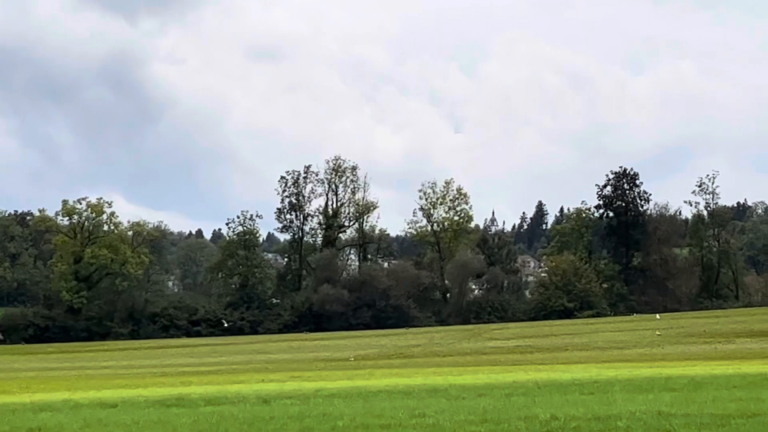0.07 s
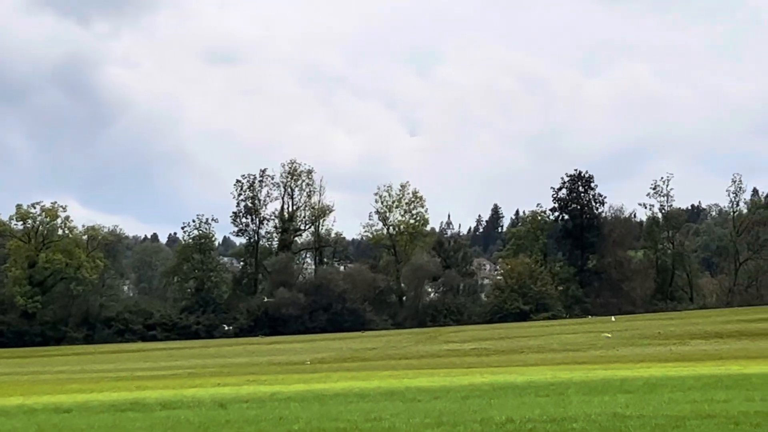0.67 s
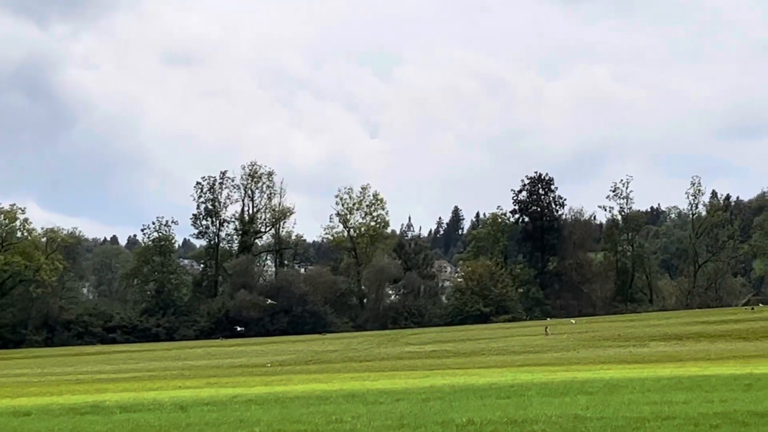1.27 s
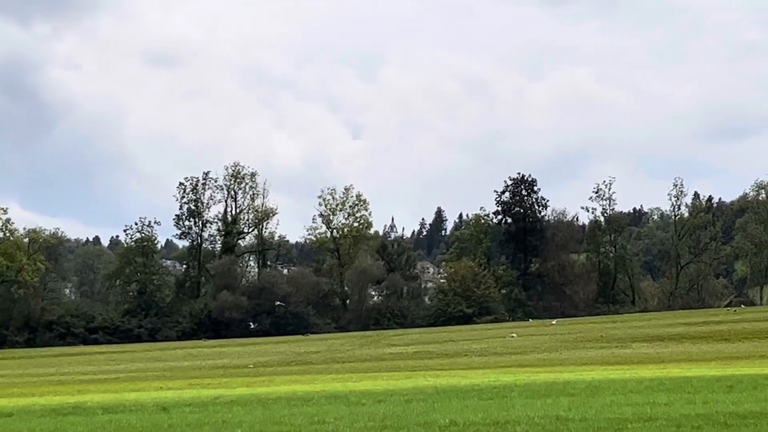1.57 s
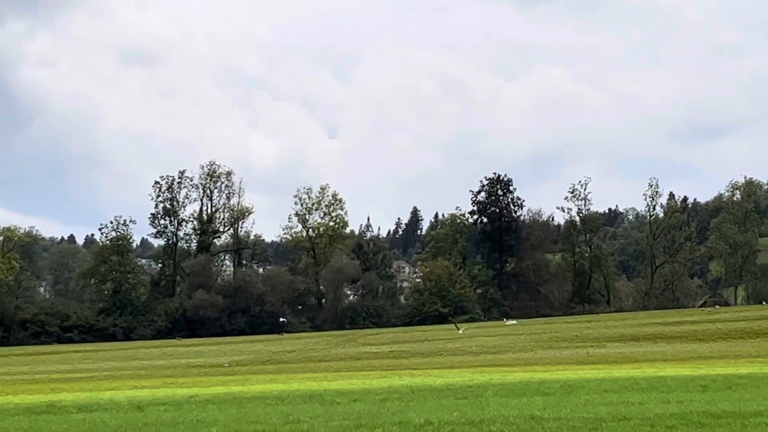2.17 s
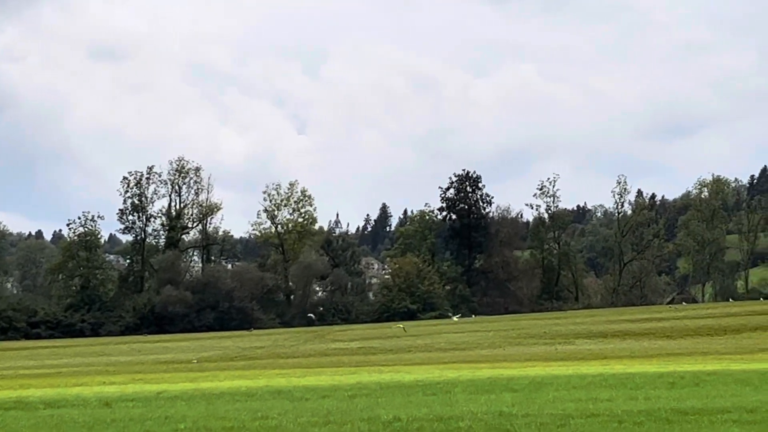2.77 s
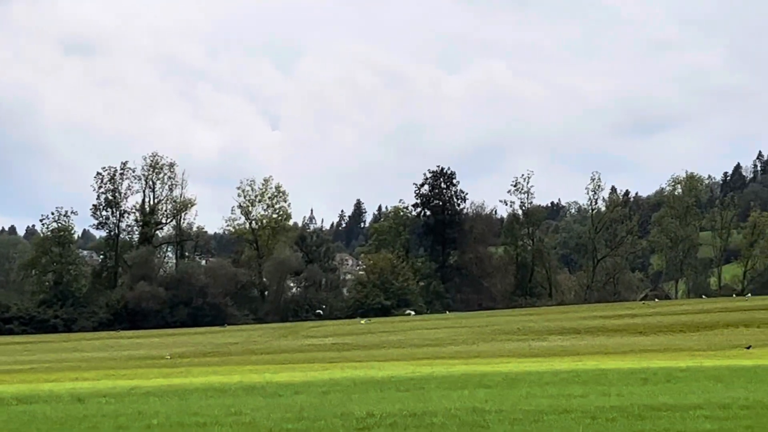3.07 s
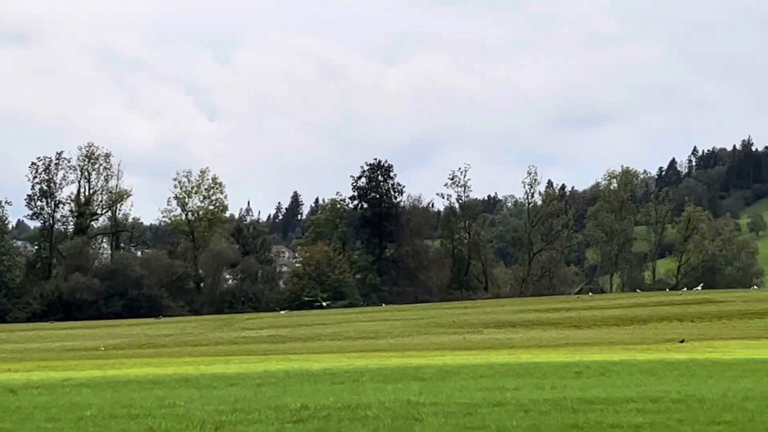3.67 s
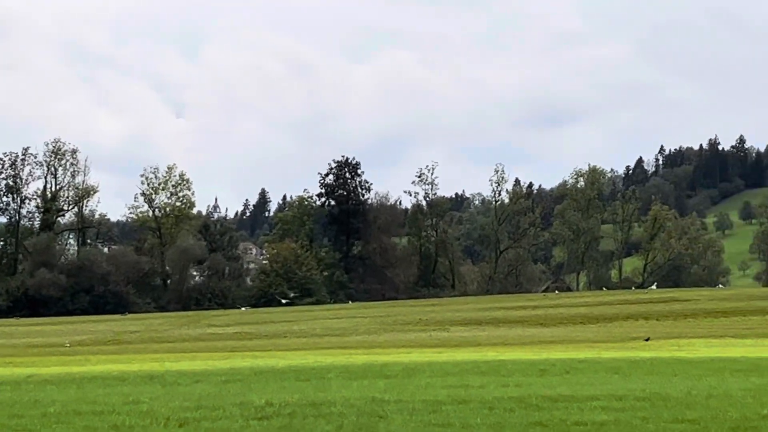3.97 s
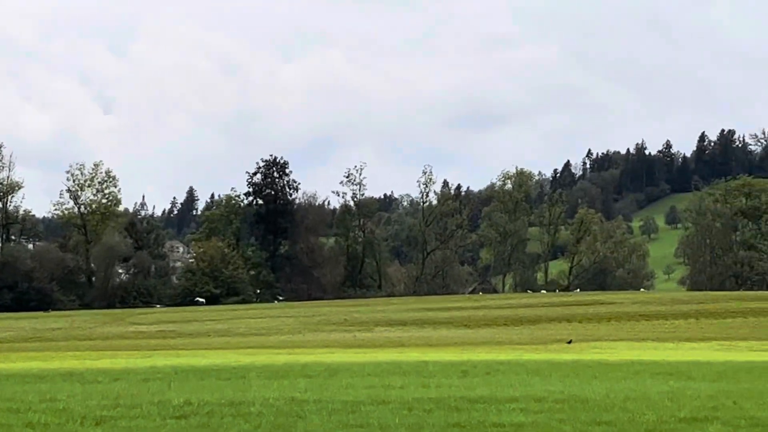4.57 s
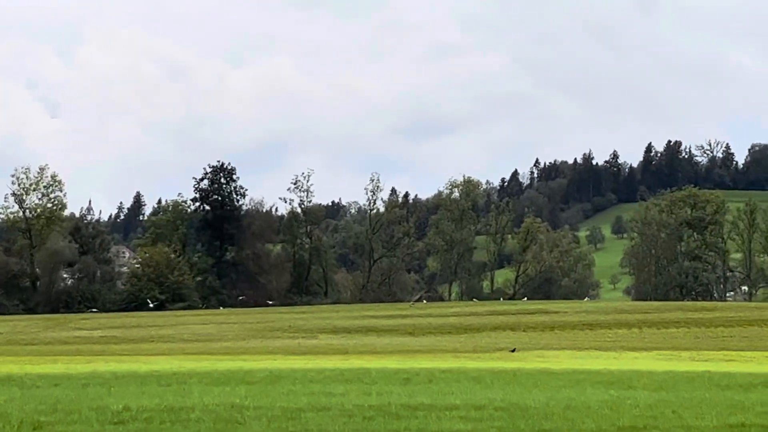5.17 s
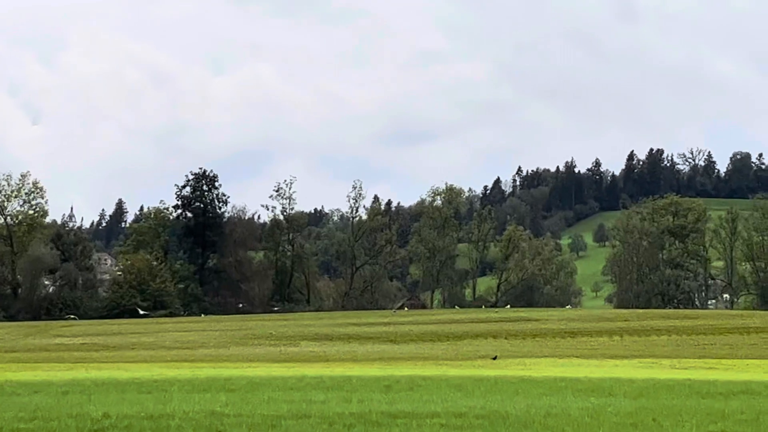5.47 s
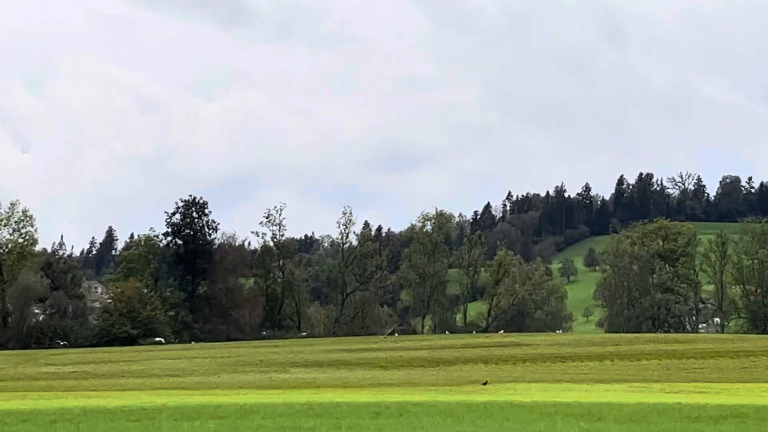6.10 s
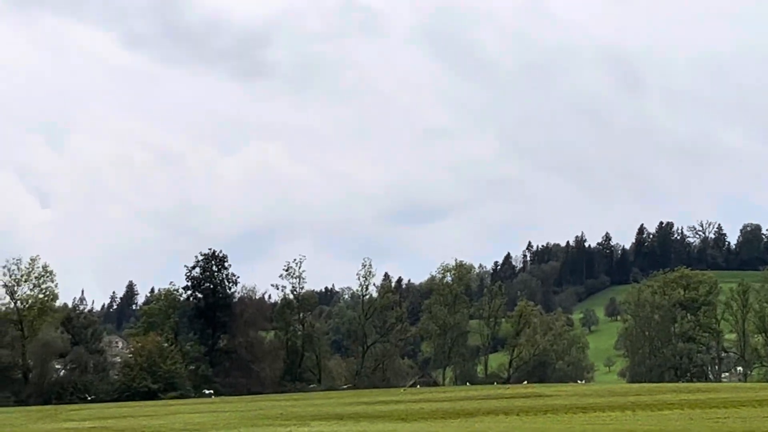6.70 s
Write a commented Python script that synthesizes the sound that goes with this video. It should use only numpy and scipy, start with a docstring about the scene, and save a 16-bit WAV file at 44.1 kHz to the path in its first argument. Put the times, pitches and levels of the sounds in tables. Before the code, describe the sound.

Outdoors by a meadow, a far-off car hums and rumbles along a country road, drawing nearer. A faint knock and a tick come from handling the camera. The engine drone and the rush of tyres swell to a peak as the car goes by close to the microphone, then drop in pitch and start to recede.

```python
"""A car on a country road beside an open field. Far off, only low rumble, engine drone and the band of
tyre tread song carry over the grass; a distant bird calls once and four soft low bumps sound. The
hand-held camera ticks at 4 and 4.9 s. As the car nears, mid-range roar and tyre hiss fill in, the notch
of the ground reflection climbs and an 85 Hz tone swells briefly. The car passes close by at 5.3 s,
engine pitch falling by Doppler shift, and drives on."""
import sys
import numpy as np
from scipy import signal
from scipy.fft import rfft, irfft, next_fast_len
from scipy.io import wavfile
from scipy.ndimage import map_coordinates

SR = 44100
rng = np.random.default_rng(int(sys.argv[2]) if len(sys.argv) > 2 else 0)


def wav_out(sig):
    """Save sig, one row per channel (or a flat mono array), as 16-bit PCM at SR to the path in sys.argv[1]."""
    wavfile.write(sys.argv[1], SR, np.round(np.clip(np.atleast_2d(sig).T, -1, 1) * 32767).astype(np.int16))


N = 306054
FRAME, HOP = 2048, 512
TIME_S = np.arange(N) / SR
BINS_HZ = np.maximum(np.arange(FRAME // 2 + 1) * SR / FRAME, 1)
ABREAST_S, SPEED_M_PER_S, NEAREST_M, SOUND_M_PER_S = 5.29, 19, 11.6, 343

# bird call: centre_s, half_length_s, pitch_hz, glide_hz_per_s, peak_db
BIRD_CALL = (.371, .009, 4780, -19000, -81)
# four soft bumps, then an 85 Hz swell as the car draws level: centre_s, half_length_s, pitch_hz, peak_db
LOW_TONES = [(.38, 0.058, 74.8, -42), (1.478, 0.042, 72, -40.5), (2.727, 0.038, 70, -41),
             (3.313, 0.015, 67.86, -36), (5.12, 0.16, 85, -38.5)]
# camera ticks and case knock: start_s, unfiltered_db, decay_s
CAMERA_TICKS = [(4.002, -62, .008), (4.010, -61, .008), (4.022, -66, .01), (4.918, -49.5, 0.0026)]
CAMERA_KNOCKS = [(4.003, -39, 0.019)]

# reach and directivity: base_db, loss_db_per_doubling, rear_db, beam_deg, beam_width_deg, beam_db
FIRING_CARRY = (-38, 5.5, 1.5, 24, 17, 9.5)
RUMBLE_CARRY = (-58.5, 5.0, -0.2, 38, 18.5, 4.5)
ROAR_CARRY = (-76.5, 4.5, 2.5, 24.5, 44, 14)
TREAD_CARRY = (-69, 5, -2.5, 45, 34.5, 11)
HISS_CARRY = (-83.0, 7.5, 9, -8.5, 54, -6)
# brief swells and dips: centre_s, half_length_s, gain_db
FIRING_SWELLS = [(4.78, .07, 3), (5.25, .08, -1), (5.78, 0.073, 2.5), (6.38, .1, -1), (6.88, .18, 2.5)]
RUMBLE_SWELLS = [(2.55, 0.48, -2), (4.15, .15, 1), (5.05, 0.073, 3.5), (5.95, 0.12, 1.2), (6.7, .25, -2)]
TREAD_SWELLS = [(.08, .15, 1.5), (1.55, 0.063, 1), (2.5, .4, -1.1), (4.1, 0.14, 1), (4.35, 0.058, -0.5),
                (4.56, 0.11, 1.4), (5.72, 0.088, 0.5), (6.4, 0.12, -1.5)]
HISS_SWELLS = [(.92, .08, 3), (1.55, .07, 4.5), (1.85, .08, 3), (2.9, .25, 1.5), (3.95, 0.29, 1.5),
               (5.22, 0.13, 3), (5.564, 0.13, -1.2)]

# drone, the non-integer partial belt-driven: firing_multiple, coming_db, going_db, loss_db_per_doubling
DRONE_PARTIALS = [(2, -53.5, -51, 6), (3, -45.5, -51, 6), (4, -38, -41, 10.5), (4.28, -52, -45.5, 8),
                  (5, -60, -52, 5.5)]
# far whine on engine order 10: time_s, level_db
ENGINE_WHINE = [(0, -88.5), (.35, -72), (.85, -71.5), (1.2, -86), (1.9, -86), (2.15, -76), (2.4, -88),
                (4, -92)]

# rolling noise spectra: freq_hz, gain_db
RUMBLE_COMING = [(20, -24), (30, -9), (45, 5), (70, 7.5), (100, 0), (160, -3), (210, -6), (260, -11),
                 (330, -18.5), (430, -36.5), (800, -68.5)]
RUMBLE_GOING = [(20, -37), (30, -23), (45, -6), (70, 4.5), (100, -2.5), (160, -1.6), (240, -1.5),
                (330, -10), (430, -14.5), (800, -65.5)]
ROAR_SPECTRUM = [(150, -22), (260, -2), (350, -2), (550, 1), (850, -7.5), (1050, -11), (1400, -16),
                 (2500, -29.5), (5000, -80)]
TREAD_COMING = [(400, -30), (650, -7.5), (850, -6.5), (1100, -8), (1450, -4), (1700, 0.5), (1950, 2),
                (2300, -8.5), (2600, -17.5), (3200, -55.5), (5000, -81)]
TREAD_GOING = [(400, -40), (650, -5.5), (850, 2.5), (1100, -1), (1450, 2.5), (1700, 0.5), (1950, -4.5),
               (2300, -22), (2600, -16), (3200, -43), (5000, -80)]
HISS_FAR = [(300, -50), (1200, -23), (2200, 0.5), (3000, 1), (3600, 4), (4050, -1.5), (4550, -11.5),
            (5100, -7), (5700, -4.5), (6600, -9.5), (8000, -17.5), (10000, -21.5), (14000, -34)]
HISS_NEARING = [(300, -51), (1200, -25), (2200, 6.5), (2850, 1.5), (3600, 7.5), (4500, -1.5), (5100, -2),
                (5600, -7.5), (7200, -4), (10000, -9), (11500, -32.5), (14000, -28)]
HISS_CLOSE = [(300, -50), (1200, -22), (2200, 4.5), (3000, 4), (3600, 0.5), (4500, -3.5), (5100, -3.5),
              (6000, -5.5), (7200, -11), (9500, -17), (11500, -20.5), (14000, -26.5)]
# moving peaks of tread song, roar and tyre ring: time_s, centre_hz, gain_db
TREAD_NOTE = [(0, 1860, 1), (4.2, 1920, 1.5), (4.5, 1450, 5.5), (4.95, 1440, 2), (5.2, 1610, 0),
              (5.5, 1860, 4.5), (5.75, 1790, 3.5), (6.05, 1680, 0.1), (6.55, 1520, 3), (6.94, 1550, 1.5)]
ROAR_PEAK = [(3, 650, -1.5), (4.0, 645, 4), (4.5, 695, 1.5), (4.95, 960, -2.5), (5.15, 900, -2),
             (5.33, 670, 1.5), (5.5, 720, 0), (5.75, 1100, 1.5), (6.05, 1010, -2.5), (6.6, 1050, -0.5)]
TYRE_RING = [(0, 910, 1), (4.2, 923, 2.5), (4.9, 890, 2), (5.25, 870, 0.5), (5.48, 870, 5), (5.7, 793, 3),
             (5.95, 830, -3.5), (6.15, 840, -1), (6.4, 860, 3.5), (6.94, 855, 3)]
# hiss bands, most as the wheel sides show: centre_s, half_length_s, centre_hz, width_oct, gain_db
HISS_SWISHES = [(2.55, .55, 4600, .13, -4), (2.75, .45, 5800, .2, 3), (4.5, 0.33, 6600, .25, -3),
                (4.85, 0.18, 2778, 0.37, 5), (5.03, .08, 12100, 0.41, 4.5), (5.8, .06, 11500, .5, 3.2),
                (5.23, 0.11, 5600, .5, 1.5), (5.41, 0.12, 2880, 0.94, 6.5)]

# left-right balance and phase, with a constant phase flip near 1650 Hz:
# freq_hz, left_minus_right_db, left_lead_rad, coherence
STEREO_COMING = [(60, -0.5, -0.53, 1), (130, 0, -0.56, 1), (262, 4.5, -0.56, 0.9), (392, -1.5, -1.1, 0.2),
                 (483, 0.2, -2, 0.35), (630, -3, -3, 0.63), (780, -7.5, -3, 0.68), (1050, -7, -3, 0.6),
                 (1330, -13.5, -2.5, 0.58), (1640, -18, -2, 0.8), (1720, -17, 0.5, 0.94),
                 (1960, -21.5, 0.3, 0.93), (2250, -14, 0.3, 0.7), (2550, -10, -2, 0.9),
                 (2820, -4.5, 0.5, 0.4), (2920, -3, 1, 0.45), (3240, -2, 0.74, 0.9), (3550, -1, 0, 1),
                 (4500, 0, 0, 1)]
STEREO_ABREAST = [(60, 0.5, 0, 0.99), (260, 0.3, 0, 1), (450, -1, 0.5, 0.75), (650, -3, 2.5, 0.72),
                  (935, -1, 2, 0.57), (1160, -4.5, 1.1, 0.6), (1600, -21, -1.5, 0.62), (1670, -10, 3, 0.9),
                  (1850, -15, 0.5, 0.82), (2060, -10, 3, 0.5), (2250, -4, 1, 0.8), (2600, -6, -0.3, 1),
                  (3000, -3, -0.1, 0.95), (3550, 0, 0, 1)]
STEREO_GOING = [(60, 0.2, 0, 1), (130, 0, 0.34, 0.98), (270, 1.5, 0.72, 0.93), (457, 2.5, 1.5, 0.95),
                (724, 5.5, 2, 1), (1030, -0.5, 2.5, 0.92), (1380, -10, 3.5, 0.93), (1650, -8, 3.5, 0.92),
                (1705, -10, 1, 0.79), (1950, -12, 1.5, 0.78), (2140, 6, 1.4, 0.91), (2350, 0, 0, 1),
                (2750, -1, 0.57, 0.96), (3600, -0.5, 0, 1)]
# microphone ports in the treble: freq_hz, left_lead_rad, coherence
PORT_PHASE = [(5030, 0, 1), (5900, -0.3, 0.51), (7160, -1, 0.6), (7630, -2.5, 1), (8940, -3.5, 1),
              (9700, -4.5, 0.8), (10900, -6, .95), (12800, -8, 1), (14100, -8, .7)]


def from_db(db):
    return 10 ** (np.asarray(db) / 20)


def bell(offset, width):
    return np.exp(-(offset / width) ** 2)


def band(centre_hz, width_oct):
    """Bell of height 1 over the bins."""
    return bell(np.log2(BINS_HZ[:, None] / centre_hz), width_oct)


def swells_db(rows, time_s):
    return sum(gain_db * bell(time_s - centre_s, half_s) for centre_s, half_s, gain_db in rows)


def ramp(time_s, at_s, over_s):
    """Smooth step from 0 to 1."""
    return .5 + .5 * np.tanh((time_s - at_s) / over_s)


def mix(first, second, share):
    return (1 - share) * first + share * second


def at_times(rows, time_s):
    """Table columns at the given times."""
    knots_s, *columns = np.transpose(rows)
    return [np.interp(time_s, knots_s, column) for column in columns]


def at_bins(rows):
    """Table columns over the bins, as column vectors."""
    knots_hz, *columns = np.transpose(rows)
    return [np.interp(np.log(BINS_HZ), np.log(knots_hz), column)[:, None] for column in columns]


def spectrum_db(rows):
    return at_bins(rows)[0]


def drift(rate_hz):
    """Smooth random curve, spread about 1."""
    return map_coordinates(rng.standard_normal(1024), [TIME_S * rate_hz], order=3, mode="wrap")


def white_frames():
    """STFT of white noise at 0 dB per Hz."""
    return signal.stft(rng.standard_normal(N) * np.sqrt(SR / 2), nperseg=FRAME, noverlap=FRAME - HOP)[2]


def bird():
    """Far call: one short falling sine."""
    centre_s, half_s, pitch_hz, glide_hz_per_s, peak_db = BIRD_CALL
    since_s = TIME_S - centre_s
    cycles = since_s * (pitch_hz + glide_hz_per_s * since_s / 2)
    return from_db(peak_db) * bell(since_s, half_s) * np.sin(2 * np.pi * cycles)


def low_tones():
    """Brief low sines that swell and fade."""
    out = np.zeros(N)
    for centre_s, half_s, pitch_hz, peak_db in LOW_TONES:
        envelope = from_db(peak_db) * bell(TIME_S - centre_s, half_s)
        out += envelope * np.sin(2 * np.pi * (pitch_hz * TIME_S + rng.random()))
    return out


def camera_clicks(rows, band_hz):
    """Ticks or knocks of the case: fast-decaying bursts of band noise."""
    envelope = np.zeros(N)
    for start_s, level_db, decay_s in rows:
        envelope += from_db(level_db) * (TIME_S >= start_s) * np.exp(-np.abs(TIME_S - start_s) / decay_s)
    bandpass = signal.butter(2, band_hz, "band", fs=SR, output="sos")
    return signal.sosfilt(bandpass, envelope * rng.standard_normal(N) + 1e-18)


def car_position(time_s):
    """Straight road: distance over NEAREST_M, and bearing_deg (-90 coming, 0 abreast, 90 gone)."""
    along = (time_s - ABREAST_S) * SPEED_M_PER_S / NEAREST_M
    return np.hypot(1, along), np.degrees(np.arctan(along))


def carried_db(carry, time_s):
    """Level of one part of the car, by distance and by the side facing the camera."""
    base_db, loss_db_per_doubling, rear_db, beam_deg, width_deg, beam_db = carry
    distance, bearing_deg = car_position(time_s)
    facing_db = rear_db * np.sin(np.radians(bearing_deg))
    facing_db += beam_db * bell(bearing_deg - beam_deg, width_deg)
    return base_db - loss_db_per_doubling * np.log2(distance) + facing_db


def doppler(time_s):
    """Pitch factor: above 1 coming, below 1 going."""
    _, bearing_deg = car_position(time_s)
    return 1 / (1 + SPEED_M_PER_S / SOUND_M_PER_S * np.sin(np.radians(bearing_deg)))


def ground_reflection_db(time_s, far_hz, near_hz, cut_db, lift_db, width_oct):
    """A delayed copy off the grass cancels a band that climbs; a shallow notch follows behind the car."""
    distance, _ = car_position(time_s)
    sink = distance ** -.15
    notch_hz = far_hz * (near_hz / far_hz) ** ramp(time_s, at_s=5.26, over_s=.3) * sink
    strength = distance ** -.55 * (1 - ramp(time_s, at_s=5.35, over_s=.46))
    comb_db = lift_db * band(2 * notch_hz, width_oct) - cut_db * band(notch_hz, width_oct)
    behind_db = -2.5 * ramp(time_s, at_s=5.95, over_s=.15) * band(660 * sink, width_oct=.39)
    return strength * comb_db + behind_db


def stereo_noise(gains, time_s):
    """Noise shaped by STFT gains; left-right balance and phase go from coming through abreast to going."""
    def passing(coming, abreast, going, turn):
        return mix(coming, mix(abreast, going, turn), ramp(time_s, at_s=4.77, over_s=.14))

    stages = [at_bins(rows) for rows in (STEREO_COMING, STEREO_ABREAST, STEREO_GOING)]
    pans_db, leads_rad, coherences = np.swapaxes(stages, 0, 1)
    cross = passing(*(coherences * np.exp(1j * leads_rad)), turn=ramp(time_s, at_s=5.17, over_s=.11))
    left_ratio = from_db(passing(*pans_db, turn=ramp(time_s, at_s=5.7, over_s=.3)))
    _, port_coherence = at_bins(PORT_PHASE)
    coherence = np.clip(np.abs(cross) * port_coherence, 0, 1)
    mid = np.sqrt(1 + coherence) * white_frames()
    side = np.sqrt(1 - coherence) * white_frames()
    left = left_ratio * (mid + side) * np.exp(1j * np.angle(cross))
    frames = np.array([left, mid - side]) * gains / np.sqrt(1 + left_ratio ** 2)
    return signal.istft(frames, nperseg=FRAME, noverlap=FRAME - HOP)[1][:, :N]


def engine(abreast_hz, sag_hz_per_s, waver_db, port_lag_s):
    """Wavering firing tone, exhaust partials and a thin whine; the rate sags as the driver eases off."""
    firing_hz = (abreast_hz - sag_hz_per_s * (TIME_S - ABREAST_S)) * doppler(TIME_S)
    firing_db = carried_db(FIRING_CARRY, TIME_S) + swells_db(FIRING_SWELLS, TIME_S)
    passed = ramp(TIME_S, at_s=4.98, over_s=.68)
    lead_s = port_lag_s * (2 * passed - 1) * np.array([[.5], [-.5]])  # right leads coming, left going
    phase_rad = 2 * np.pi * (np.cumsum(firing_hz) / SR + firing_hz * lead_s)
    tones = from_db(firing_db + waver_db * drift(rate_hz=9)) * np.sin(phase_rad + .27 * drift(rate_hz=8))
    body_shadow = (-10, 32, -6)  # bearing_deg, width_deg, gain_db
    for multiple, coming_db, going_db, loss_db_per_doubling in DRONE_PARTIALS:
        reach_db = carried_db((0, loss_db_per_doubling, 0, *body_shadow), TIME_S)
        gain = from_db(reach_db + mix(coming_db, going_db, passed) + waver_db * drift(rate_hz=7))
        tones += gain * np.sin(multiple * phase_rad + rng.uniform(0, 2 * np.pi) + .23 * drift(rate_hz=6.4))
    whine_db = at_times(ENGINE_WHINE, TIME_S)[0] + [[5], [-3]]  # louder on the left
    whine = from_db(whine_db) * np.sin(10 * phase_rad + .9 * drift(rate_hz=17))
    return np.sqrt(2) * (tones + whine)


def rumble_db(time_s):
    """Low rumble: from afar only its lowest part arrives."""
    passed = ramp(time_s, at_s=3.9, over_s=1.6)
    shape_db = mix(spectrum_db(RUMBLE_COMING), spectrum_db(RUMBLE_GOING), passed)
    return carried_db(RUMBLE_CARRY, time_s) + swells_db(RUMBLE_SWELLS, time_s) + shape_db


def roar_db(time_s):
    """Mid-range roar: the grass swallows it until the car is near."""
    return carried_db(ROAR_CARRY, time_s) + spectrum_db(ROAR_SPECTRUM)


def tread_song_db(time_s):
    """Tread song: sinks in pitch on passing; a narrow note stands out behind the car."""
    passed = ramp(time_s, at_s=5.14, over_s=.87)
    shape_db = mix(spectrum_db(TREAD_COMING), spectrum_db(TREAD_GOING), passed)
    note_hz, note_db = at_times(TREAD_NOTE, time_s)
    shape_db += note_db * band(note_hz, width_oct=.16)
    shape_db += 2.5 * ramp(time_s, at_s=5.7, over_s=.22) * band(centre_hz=1725, width_oct=.022)
    return carried_db(TREAD_CARRY, time_s) + swells_db(TREAD_SWELLS, time_s) + shape_db


def tyre_hiss_db(time_s):
    """Tyre hiss: brighter as less air lies between, flaring as the car draws level."""
    coming_db = mix(spectrum_db(HISS_FAR), spectrum_db(HISS_NEARING), ramp(time_s, at_s=3.1, over_s=.72))
    shape_db = mix(coming_db, spectrum_db(HISS_CLOSE), ramp(time_s, at_s=4.28, over_s=.32))
    for centre_s, half_s, centre_hz, width_oct, gain_db in HISS_SWISHES:
        shape_db += gain_db * bell(time_s - centre_s, half_s) * band(centre_hz, width_oct)
    return carried_db(HISS_CARRY, time_s) + swells_db(HISS_SWELLS, time_s) + shape_db


def rolling_noise(tread_flutter_db, hiss_flutter_db):
    """Tyres and body: four noises summed in power; moving air makes the upper two flutter."""
    time_s = np.arange(int(np.ceil(N / HOP)) + 1) * HOP / SR
    air = np.interp(time_s, TIME_S, drift(rate_hz=18))
    rumble = from_db(rumble_db(time_s))
    roar = from_db(roar_db(time_s))
    tread = from_db(tread_song_db(time_s) + tread_flutter_db * air)
    hiss = from_db(tyre_hiss_db(time_s) + hiss_flutter_db * air)
    total = np.sqrt(rumble ** 2 + roar ** 2 + tread ** 2 + hiss ** 2)
    peak_hz, peak_db = at_times(ROAR_PEAK, time_s)
    ring_hz, ring_db = at_times(TYRE_RING, time_s)
    colour_db = peak_db * band(peak_hz, width_oct=.22) + ring_db * band(ring_hz, width_oct=.11)
    ground_db = ground_reflection_db(time_s, far_hz=612, near_hz=2100, cut_db=7.5, lift_db=.8,
                                     width_oct=.29)
    return stereo_noise(total * from_db(ground_db + colour_db), time_s)


def scene():
    """Car, camera clicks, low tones and a far bird."""
    car = rolling_noise(tread_flutter_db=.55, hiss_flutter_db=.9)
    car += engine(abreast_hz=61.04, sag_hz_per_s=.42, waver_db=1.14, port_lag_s=.00037)
    ticks = camera_clicks(CAMERA_TICKS, band_hz=(3200, 14000))
    knock = camera_clicks(CAMERA_KNOCKS, band_hz=(350, 2000))
    return car + ticks + knock + low_tones() + bird()


def record(dry):
    """Two microphone ports turn out of phase and back in the treble; deep bass and top are cut."""
    knots_hz, lead_rad, _ = np.transpose(PORT_PHASE)
    size = next_fast_len(N + FRAME)
    turn_rad = np.interp(np.fft.rfftfreq(size, 1 / SR), knots_hz, lead_rad)
    left = irfft(rfft(dry[0], size) * np.exp(1j * turn_rad), size)[:N]
    low_cut = signal.butter(4, 31.4, "high", fs=SR, output="sos")
    high_cut = signal.ellip(10, .2, 80, 14100, fs=SR, output="sos")
    return signal.sosfilt(high_cut, signal.sosfilt(low_cut, [left, dry[1]]))


dry = scene()
out = record(dry)
wav_out(out)
```